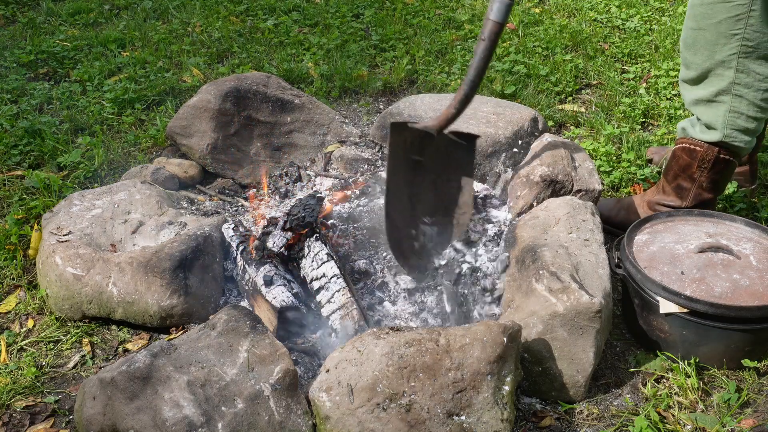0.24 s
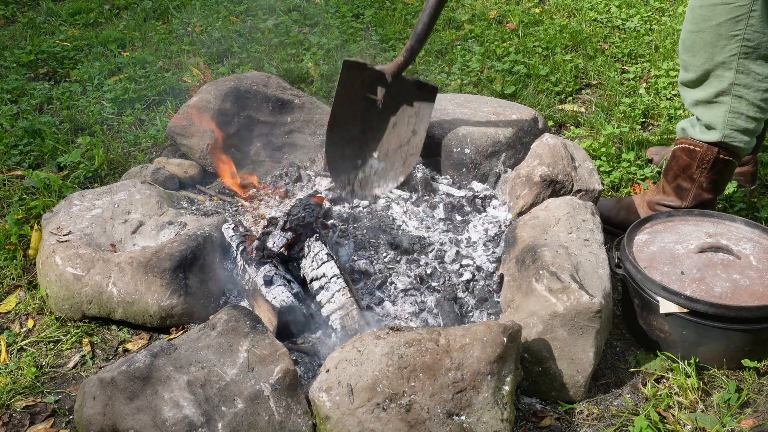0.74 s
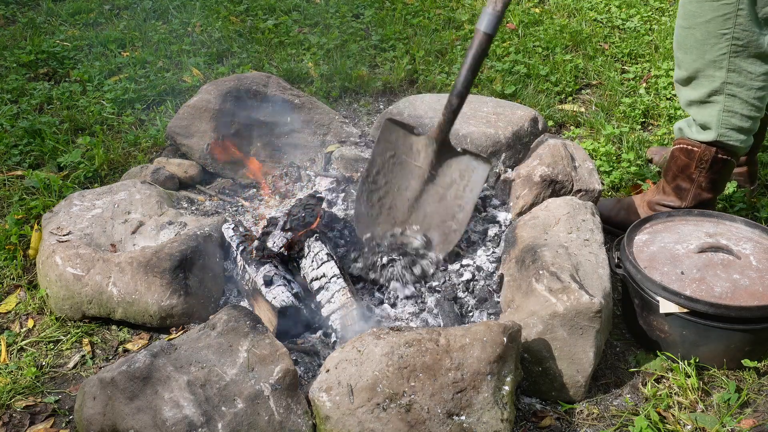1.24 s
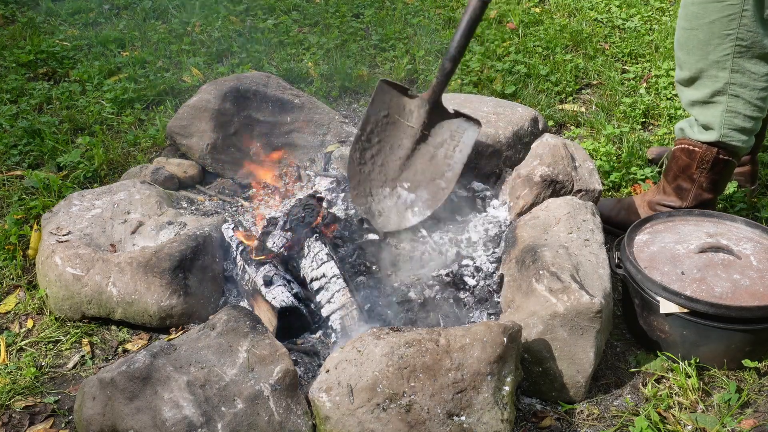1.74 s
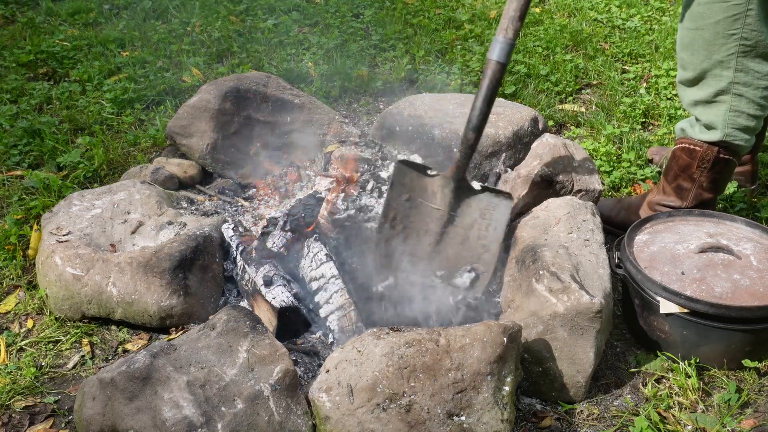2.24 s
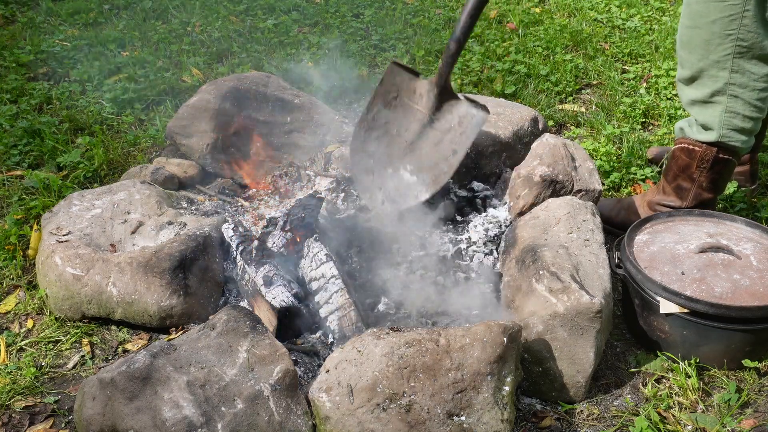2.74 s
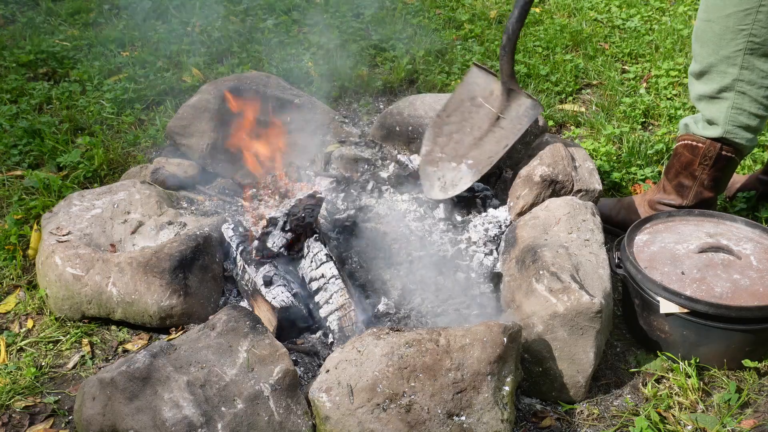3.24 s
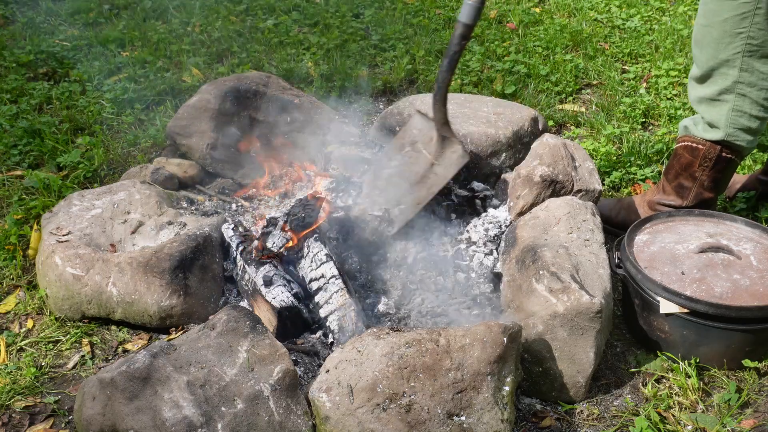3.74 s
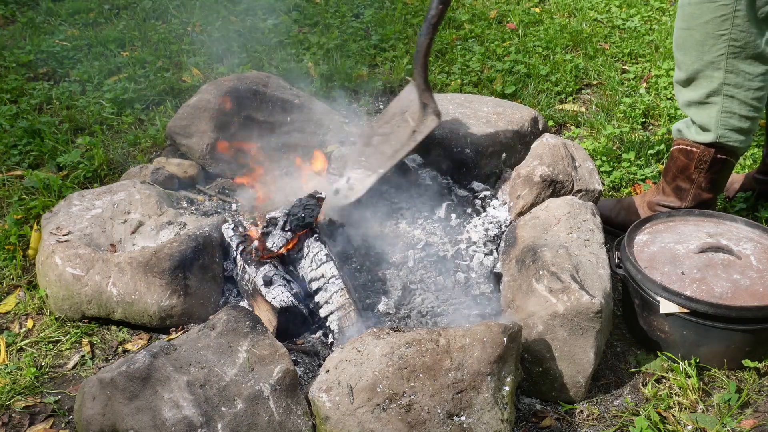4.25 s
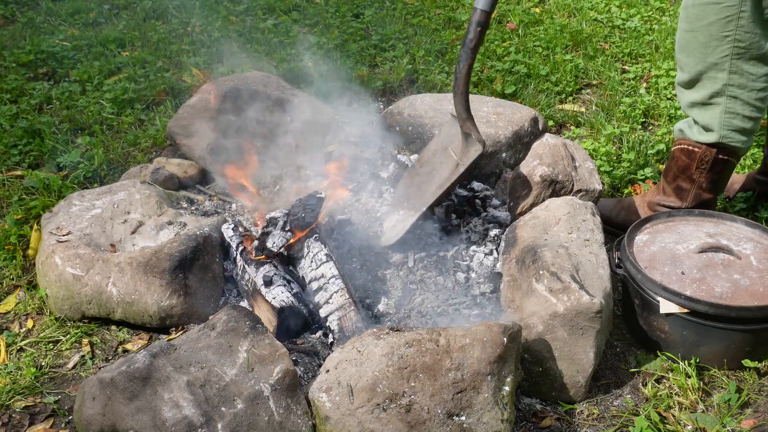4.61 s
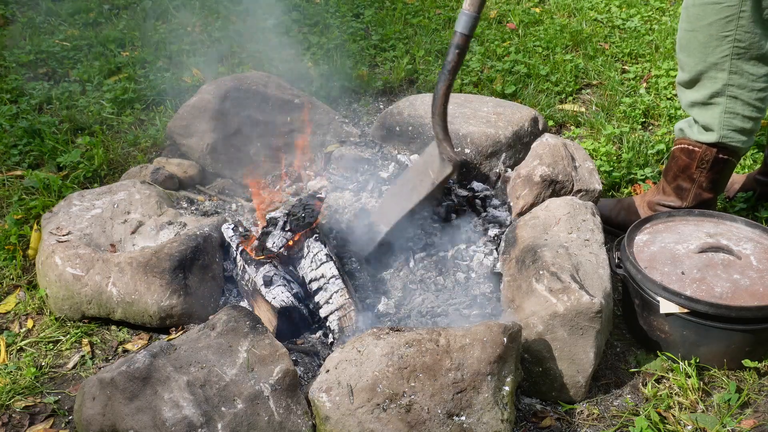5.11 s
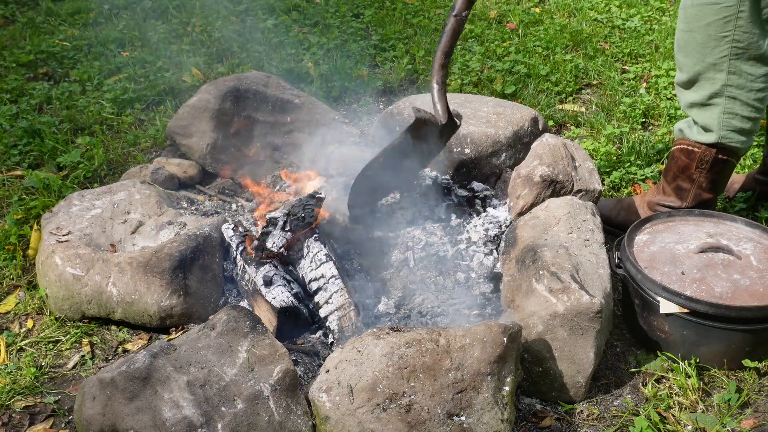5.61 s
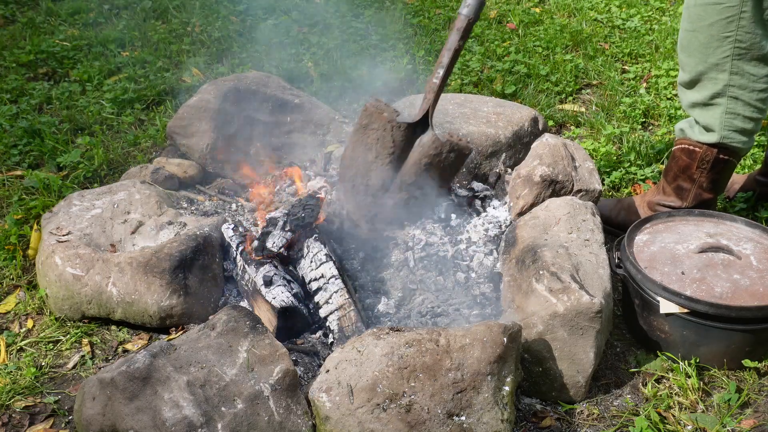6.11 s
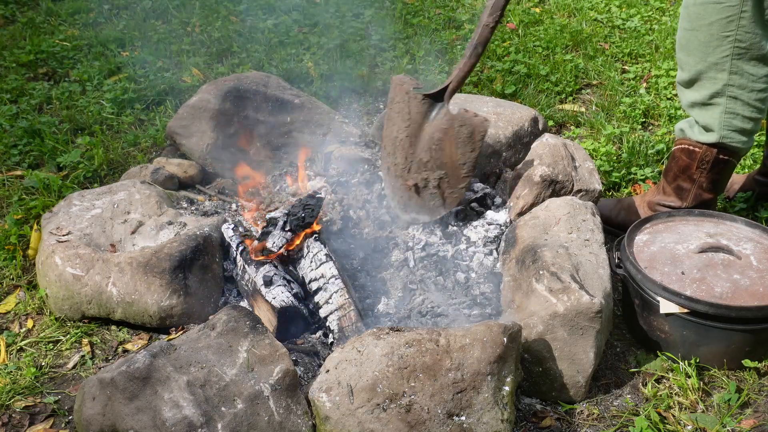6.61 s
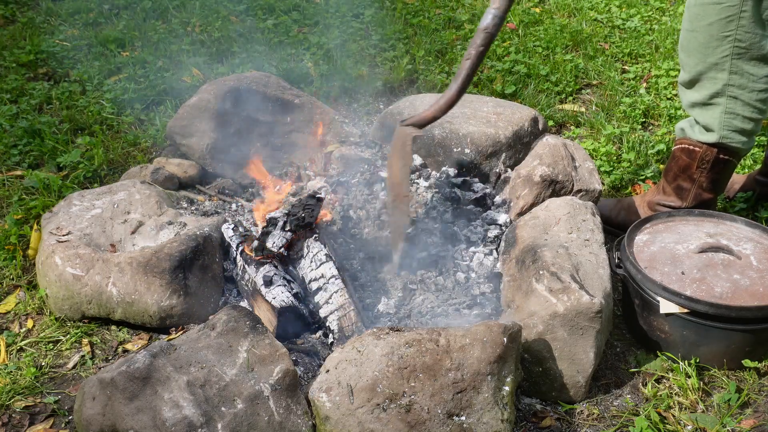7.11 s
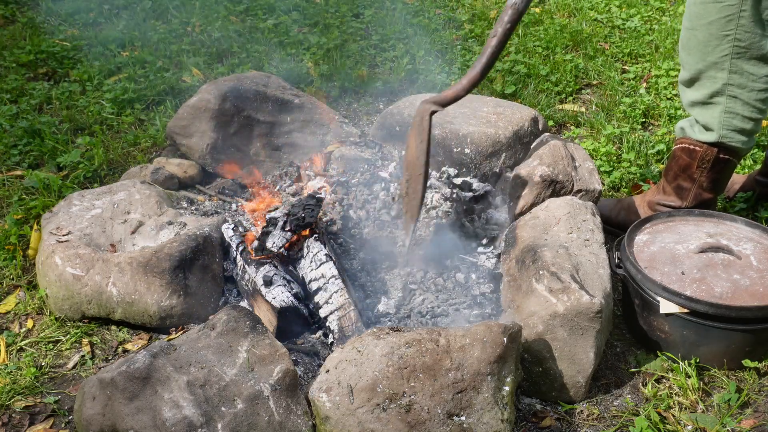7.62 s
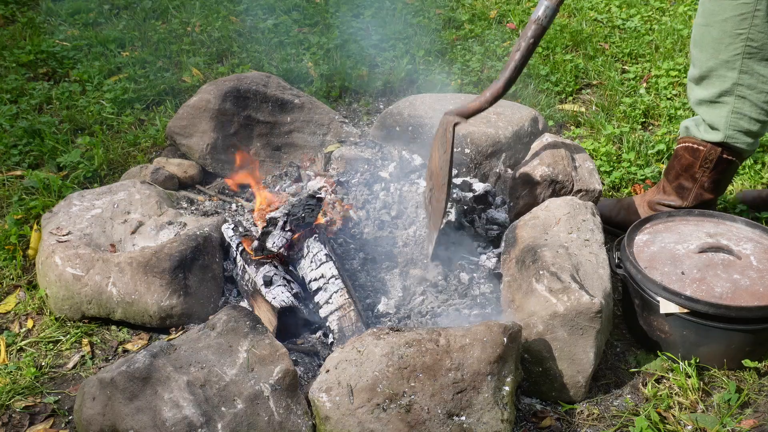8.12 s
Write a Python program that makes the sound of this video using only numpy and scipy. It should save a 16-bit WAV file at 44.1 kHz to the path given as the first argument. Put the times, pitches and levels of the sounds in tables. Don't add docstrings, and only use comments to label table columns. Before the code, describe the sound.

A steel spade works through ashes and coals in a stone fire ring in an open meadow, heard close in stereo with almost no echo. From 0 to 0.3 seconds it rasps loudly, crunching brittle lumps amid thumping wind. Another hard knock and scrape come at 0.7-0.9, with smaller strokes around 1.2, a big wind thump near 1.5, and softer scrapes at 2-2.5. After a lull, knocks and rasps return at 3.4-3.7; a hard cinder clinks brightly at 3.8 and bounces. Wind is calmer here. A very faint distant machine whines from about 4.3 to 6, while light jabs and clinks occur around 5.3-5.5 and 6-6.4. Low gusts swell strongly at 6.3-6.8. Weak scrapes follow at 7.2-7.4 and 7.8-7.9, with sharp ember snaps near 7.7 and more buffeting to the end at 8.4. Fine crackle and high and lower insect trills continue throughout.

```python
import sys
import numpy as np
from scipy import signal
from scipy.fft import rfft, irfft, next_fast_len
from scipy.io import wavfile
from scipy.ndimage import map_coordinates

SR = 44100
rng = np.random.default_rng(int(sys.argv[2]) if len(sys.argv) > 2 else 0)


def master(y):
    cut = np.clip(np.atleast_2d(y).T, -1, 1)
    pcm = np.round(cut * 32767)
    wavfile.write(sys.argv[1], SR, pcm.astype(np.int16))


def level_to_linear(level):
    exponent = np.asarray(level, float) / 20
    return 10 ** exponent


N = 368674


def unit(x):
    return x / np.sqrt(np.mean(x ** 2) + 1e-20)


def along(points, hz):
    f, db = np.transpose(points)
    return level_to_linear(np.interp(np.log(hz + 1), np.log(f + 1), db, left=-120, right=-120))


def curves(rows):
    s, *columns = np.transpose(rows)
    return [np.interp(np.arange(N) / SR, s, column) for column in columns]


def wobble(rate):
    knots = rng.standard_normal(int(N * rate / SR) + 4)
    return map_coordinates(knots, [np.arange(N) * rate / SR])


def filtered(x, response):
    m = next_fast_len(N + SR // 4)
    return irfft(rfft(x, m) * response(np.fft.rfftfreq(m, 1 / SR)), m)[..., :N]


def resonant(x, peaks):
    def response(hz):
        total = 0
        for k, (centre, width, db) in enumerate(peaks):
            one = 1j * hz * width / (centre ** 2 - hz ** 2 + 1j * hz * width)
            total = total + (-1) ** k * level_to_linear(db) * one
        return total

    power = sum(level_to_linear(2 * db) * np.pi * width / SR for _, width, db in peaks)
    return filtered(x, response) / np.sqrt(power)


def grains(rate, spread_db):
    chance, size = rng.random(N), rng.standard_normal((2, N))
    return unit((chance < rate / SR) * level_to_linear(spread_db * size[0]) * np.sign(size[1]))


def pair(spectrum, alike):
    alike_hz, likeness = np.transpose(alike)

    def response(hz):
        same = np.interp(np.log(hz + 1), np.log(alike_hz), likeness)
        turn = np.arccos(np.clip(same, -1, 1)) / 2
        return along(spectrum, hz) * np.array([np.cos(turn), np.sin(turn)])

    middle, side = filtered(rng.standard_normal((2, N)), response)
    return unit(np.array([middle + side, middle - side]))


def placed(x, pan_db, wide_db):
    t = np.arange(SR // 20) / SR
    stones = rng.standard_normal((2, len(t))) * level_to_linear(-60 * t / 0.091)
    back = signal.oaconvolve(x[None], stones / np.linalg.norm(stones[0]), axes=1)[:, :N]
    return x * level_to_linear(np.array([[pan_db / 2], [-pan_db / 2]])) + level_to_linear(wide_db) * back


def chips(level_db, count, centre_hz, octaves, cycles, spread_db):
    luck = rng.standard_normal((count, 2))
    start = (rng.random(count) * N).astype(int)
    hz = np.clip(centre_hz * 2 ** (octaves * luck[:, :1]), 500, 15000)
    step = np.arange(160)
    size = level_to_linear(spread_db * luck[:, 1:])
    shape = size * np.exp(-step / SR * hz / cycles) * np.sin(2 * np.pi * hz * step / SR)
    norm = np.sqrt(np.sum(shape ** 2) / N)
    shape = shape * level_to_linear(level_db[start])[:, None] / norm
    return np.bincount((start[:, None] + step).ravel(), shape.ravel(), N + len(step))[:N]


# time in seconds, buffet level in dB.
BREEZE = [(0, -27), (0.25, -30.5), (0.52, -41.5), (0.72, -49), (1.16, -39), (1.5, -54), (1.69, -50),
          (2.75, -54), (3.2, -66), (3.44, -51.5), (4.1, -64), (4.63, -43.5), (5.22, -41), (5.84, -43),
          (6.6, -35.5), (6.9, -35.5), (7.55, -40.5), (8.36, -28)]
# peak time in seconds, level in dB, seconds to fall by 10 dB.
GUSTS = [(0, -20.5, 0.0942), (0.179, -15.5, 0.0433), (0.793, -27.5, 0.08), (1.058, -33, 0.01),
         (1.35, -23, 0.1329), (1.487, -30, 0.03), (1.916, -40.5, 0.12), (2.19, -35, 0.05),
         (2.41, -37, 0.06), (2.749, -46, .2), (3.342, -45.5, .08), (3.632, -41, 0.13), (4.235, -40.5, 0.04),
         (4.53, -36, 0.12), (4.92, -31, 0.31), (5.448, -38, 0.2), (6.021, -33.5, .2), (6.435, -22, 0.13),
         (6.736, -20, 0.0742), (7.298, -33, 0.34), (7.653, -28.5, 0), (7.85, -26, 0.1), (8.02, -24.5, .18)]


def gusts():
    t = np.arange(0, N + 64, 64) / SR
    power = level_to_linear(2 * np.interp(t, *np.transpose(BREEZE)))
    for s, db, fall_s in GUSTS:
        away_s = np.maximum(t - s, 1.35 * (s - t))
        power = power + level_to_linear(2 * (db - 10 * away_s / fall_s))
    return curves(np.transpose([t, 10 * np.log10(power)]))[0]


# start in seconds, peak level in dB, pitch in Hz.
PUFFS = [(0.084, -24, 114), (0.171, -7, 116), (0.366, -15, 139), (0.771, -25, 76), (1.45, -4.5, 136),
         (3.351, -23, 79), (4.495, -18, 113), (6.316, -10.5, 160), (6.434, -12, 136), (6.709, -2.5, 90),
         (7.816, -10.5, 167), (7.911, -7.5, 156), (7.955, -12.5, 138), (8.042, -10.5, 83),
         (1.064, -21, 180), (1.254, -18, 136), (1.903, -30, 132), (2.159, -28, 109), (2.415, -25, 100),
         (4.238, -29, 92), (4.546, -21, 147), (4.796, -17, 89), (5.273, -22, 99), (6.095, -20.5, 140),
         (6.358, -15, 161), (6.542, -18, 135), (7.088, -20, 122), (7.182, -19, 89), (7.269, -19, 130),
         (7.418, -23.5, 76), (7.655, -18, 111), (7.894, -21, 120)]
# frequency in Hz, level in dB per Hz.
BUFFET = [(20, -36), (35, -15), (55, -4), (100, 2), (170, -2.5), (210, -7.5), (270, -21), (350, -51)]
# frequency in Hz, level in dB per Hz.
FLUTTER = [(130, -32), (200, 3), (320, -5.5), (450, -19), (650, -49)]


def wind():
    buffet_db = gusts()
    lumps = level_to_linear(3.0 * wobble(18))
    puffs, kicks, t = np.zeros(N + SR), np.zeros(N + SR), np.arange(SR // 10) / SR
    for s, db, hz in PUFFS:
        shape = level_to_linear(db - 10) * t / 0.012 * np.exp(1 - t / 0.0087)
        start = round(s * SR)
        puffs[start:][:len(t)] += shape * np.sin(2 * np.pi * hz * t * (1 - 1.05 * t))
        kicks[start:][:len(t)] += shape
    low = level_to_linear(buffet_db - 1.5) * unit(lumps * pair(BUFFET, [(40, 0.99), (200, 0.96)]))
    flutter_level = level_to_linear(1.176 * buffet_db - 15.5) * lumps + level_to_linear(-19.0) * kicks[:N]
    return low + flutter_level * pair(FLUTTER, [(300, 0.91)]) + puffs[:N]


# frequency in Hz, level in dB per Hz.
AIR = [(20, 0), (120, -1.5), (300, -10.5), (600, -16), (1500, -17), (3000, -15), (6000, -19), (9000, -31),
       (15500, -28)]
# frequency in Hz, likeness from 0 to 1.
AIR_ALIKE = [(100, 0.99), (300, 0.81), (1400, 0.59), (3000, 0.66), (7000, 0.11), (15000, 0.033)]


def open_air():
    return level_to_linear(-51.0 + wobble(2.19)) * pair(AIR, AIR_ALIKE)


def choir(song, rate_hz, depth, alike, count):
    t, power = np.arange(N) / SR, 0
    for _ in range(count):
        own_hz = rate_hz * (1 + 0.12 * rng.standard_normal())
        beat = 2 * np.pi * own_hz * t + 3.3 * wobble(6.7)
        power = power + (1 + depth * np.cos(beat)) ** 2
    return unit(np.sqrt(power) * pair(song, [(5000, alike)]))


# time in seconds, high choir in dB, low choir in dB.
CHOIR = [
    (0.0, -43, -47),
    (0.32, -44.5, -51.5),
    (4.75, -44.5, -52.5),
    (6.49, -45, -52.5),
    (8.36, -45.5, -54.5),
]
# frequency in Hz, level in dB per Hz.
HIGH_SONG = [(6300, -24.5), (6900, -11.5), (7300, -1), (7700, -1.5), (8100, -4.5), (8500, -22.5),
             (8900, -25)]
# frequency in Hz, level in dB per Hz.
LOW_SONG = [(3700, -27), (4000, -14), (4250, -6.5), (4500, -13.5), (4800, -24)]


def insects():
    high_db, low_db = curves(CHOIR)
    high = level_to_linear(high_db + 1.0 * wobble(3.203)) * choir(HIGH_SONG, 92, depth=0.16, alike=0.45, count=3)
    low = level_to_linear(low_db + 1.3 * wobble(2.97)) * choir(LOW_SONG, 58, depth=0.26, alike=0.73, count=3)
    return high * level_to_linear(np.array([[-0.7], [0.7]])) + low * level_to_linear(np.array([[-1.6], [1.6]]))


def embers():
    level_db = -71 + 2.2 * wobble(2.93)
    specks = chips(level_db, count=260, centre_hz=10400, octaves=0.46, cycles=10.0, spread_db=5.0)
    return placed(specks, pan_db=-4.0, wide_db=-5)


# peak time in seconds, build-up in seconds, rasp in dB,
# lowest mode over rasp in dB, ash hiss over rasp in dB.
PUSHES = [(0.039, 0.057, -23.5, 1.5, -11.5), (0.279, 0.13, -44, 3.5, -4), (0.718, 0.0053, -26.5, -11, -25),
          (0.861, 0.071, -25, -7, -14.5), (1.175, 0.022, -36.5, -9, -18), (1.233, 0.034, -33, -6, -18),
          (2.105, 0.075, -35.5, -9, -20), (2.215, 0.069, -31, 0.5, -18.5), (2.475, 0.051, -39, -6.5, -14.5),
          (3.385, 0.029, -31.5, -8, -21), (3.63, 0.058, -34, -9, -21), (3.689, 0.064, -29.5, -12, -13.5),
          (3.79, 0.05, -47, -6, -17), (7.24, 0.073, -38.5, -4.5, -15.5), (7.388, 0.056, -43.5, -9, -5),
          (7.797, 0.032, -42, -9, -25), (7.933, 0.044, -35.5, -10, -18)]
# peak time in seconds, build-up in seconds, rasp in dB,
# lowest mode over rasp in dB, ash hiss over rasp in dB.
JABS = [(0.116, 0.035, -20.5, -8.5, -12), (1.96, .03, -40, -19, -12), (2.53, .03, -40, -8, -20),
        (3.342, 0.017, -47, -15, -17), (3.412, .015, -38.5, -8, -17), (5.18, 0.014, -43, -16, -15),
        (5.215, 0.017, -42, -15, -14), (5.32, .02, -44, -11, -15), (5.505, 0.041, -40.5, -15, -16),
        (6.0, .034, -33, -11, -16), (6.425, 0.023, -40.5, -21, -17), (1.44, 0.099, -48.5, -10, -18),
        (3.22, 0.26, -63, -15, 3)]
# peak time in seconds, build-up in seconds, rasp in dB,
# ash hiss over rasp in dB.
SCUFFS = [(0.973, 0.0092, -41, -17), (1.118, 0.03, -42, -11), (1.975, 0.016, -36.5, -18),
          (2.36, 0.015, -38.5, -22), (2.938, 0.026, -60.5, 13), (4.919, 0.039, -40.5, -24),
          (5.27, 0.04, -36, -12), (5.552, 0.041, -38.5, -19), (6.153, 0.04, -39.5, -18),
          (6.325, 0.064, -39.5, -16), (6.39, 0.057, -42.5, -13), (7.069, 0.021, -45.5, -18),
          (8.276, 0.055, -53, -14)]
# peak time in seconds, rasp in dB.
SLIDES = [(0.17, -41), (1.25, -37), (2.0, -41.5), (2.5, -47.5), (3.42, -52.5), (3.74, -39.5), (5.3, -48.5),
          (6.44, -46), (6.55, -48), (1.06, -47), (7.96, -48)]
# rasp, lowest mode and ash hiss, all in dB.
REST_DB = (-63.5, -78, -73.5)


def stroke():
    bite_db_s, swell_db = 1100, 8
    lift_db_s, jab_lift_db_s, slide_db_s = 267, 700, 74
    rows = [(*push, lift_db_s) for push in PUSHES]
    rows += [(s, build_s, db, -20, ash_db, lift_db_s) for s, build_s, db, ash_db in SCUFFS]
    rows += [(*jab, jab_lift_db_s) for jab in JABS]
    rows += [(s, 0.03, db, -11.5, -17.5, slide_db_s) for s, db in SLIDES]
    t = np.arange(0, N + 64, 64) / SR
    power = level_to_linear(2 * np.array(REST_DB))[:, None]
    for s, build_s, db, low_db, ash_db, fall_db_s in rows:
        before, after = np.maximum(s - t, 0), np.maximum(t - s, 0)
        swell = -swell_db * np.minimum(before / build_s, 1)
        bite = -bite_db_s * np.maximum(before - build_s, 0)
        parts_db = np.array([[0], [low_db], [ash_db]])
        power = power + level_to_linear(2 * (db + swell + bite - fall_db_s * after + parts_db))
    return curves(np.transpose([t, *(10 * np.log10(power))]))


# pitch in Hz, level in dB, seconds to fade by 60 dB.
BLADE = [(723, -14.5, 0.076), (1197, -11.5, 0.086), (1424, -9.5, 0.083), (1557, -8.5, 0.16),
         (1618, -7.5, 0.06), (1750, -6.5, 0.089), (1822, -5, 0.14), (1953, -2.5, 0.059),
         (2119, -0.5, 0.077), (2353, -3, 0.085), (2498, -1.5, 0.035), (2725, 1, 0.08), (2990, 3, 0.062),
         (3290, 0.5, 0.1), (3520, 4.5, 0.033), (3800, 4, 0.063), (3915, 0.5, 0.08), (4130, 4.5, 0.071),
         (4540, 3, 0.06), (4815, 4, 0.049), (5335, -1.5, 0.06), (5870, -28, 0.12), (6720, -16, .06)]
# pitch in Hz, width in Hz, level in dB.
LOW_MODE = [(614, 20, -14), (718, 16, -9), (818, 16, -4), (840, 10, 0)]
# frequency in Hz, level in dB per Hz.
GRIT = [(240, -22), (400, -7.5), (623, -2.5), (819, -4.5), (1020, -8), (1610, -16), (2260, -12), (2790, 6),
        (9000, -25), (11700, -46), (19800, -120)]
# frequency in Hz, level in dB per Hz.
ASH = [(3240, -7), (5500, -7.5), (6940, -4), (9490, -6.5), (12600, -11.5), (16000, -14)]


def rasp():
    rasp_db, low_db, ash_db = stroke()
    clump_db = 2.2 * wobble(70)
    clumps = level_to_linear(clump_db)
    steel = [(hz, np.log(1000) / np.pi / t60, db) for hz, db, t60 in BLADE]
    ring = 0
    for modes, share_db in ((steel[:7], -8.5), (steel[7:14], -5.5), (steel[14:], -9.5)):
        swells = level_to_linear(2.6 * wobble(30) + 2.45 * wobble(120))
        push = unit(clumps * swells * grains(1500, spread_db=5.5))
        ring = ring + resonant(level_to_linear(rasp_db + share_db) * push, modes)
    low_push = unit(clumps * grains(2000, spread_db=4.0))
    low = resonant(level_to_linear(low_db - 5.5) * low_push, LOW_MODE)
    grit = filtered(grains(3000, spread_db=5.5), lambda hz: along(GRIT, hz))
    crunch = unit(clumps * level_to_linear(1.3 * wobble(150)) * grit)
    coals = chips(rasp_db + clump_db - 7.5, count=6000, centre_hz=3600, octaves=0.55, cycles=3.3, spread_db=3.0)
    ash = filtered(grains(4000, spread_db=5), lambda hz: along(ASH, hz))
    hiss = unit(clumps * level_to_linear(3.95 * wobble(200)) * ash)
    body = ring + low + coals + level_to_linear(rasp_db - 9.5) * crunch
    hiss = level_to_linear(ash_db + 2.5) * hiss
    return placed(body, pan_db=-0.9, wide_db=-51) + placed(hiss, pan_db=-2.0, wide_db=-7.5)


# start in seconds, peak level in dB, centre of the ring in Hz.
CRUSHES = [(0.0115, -14.5, 1790), (0.0304, -15, 1730), (0.2667, -28, 1750), (0.736, -17.5, 2910),
           (0.9693, -29, 3290), (1.2447, -26, 2260), (2.183, -26, 2380), (2.2127, -21, 2990),
           (4.92, -31.5, 2950), (5.5533, -22, 3960), (5.9697, -32, 2010), (7.061, -32.5, 3200),
           (7.3825, -30, 2400), (7.7586, -29, 2000), (7.922, -29, 3510), (0.7138, -9.5, 3900),
           (0.7136, -20.5, 1830), (1.2203, -26, 4180), (1.344, -30, 3800), (1.5605, -40, 4370),
           (1.9648, -22.5, 4290), (2.165, -29, 3600), (3.384, -26, 1000), (6.0015, -30, 4200),
           (6.143, -32, 3900), (0.165, -27, 1700)]
# start in seconds, peak level in dB, centre of the ring in Hz.
KNOCKS = [(0.0436, -12, 1590), (0.1012, -14.5, 3760), (0.137, -21, 3610), (0.7044, -12.5, 2990),
          (0.7138, -13, 3050), (0.782, -19, 2800), (1.0364, -26.5, 2880), (1.1526, -20.5, 3300),
          (1.1715, -28, 1890), (1.22, -16, 2800), (1.344, -27, 1980), (1.9647, -16, 3000),
          (2.0556, -24, 2900), (2.089, -26.5, 2650), (2.3493, -28.5, 2780), (3.3597, -20.5, 2720),
          (3.3842, -18.5, 2720), (3.408, -31, 1770), (3.645, -22, 2720), (3.669, -20, 2750),
          (4.8852, -31.5, 3400), (5.2596, -29, 1580), (5.5446, -22, 1640), (5.5642, -25.5, 1870),
          (6.284, -27, 4130), (6.409, -24.5, 3460), (7.152, -32, 3000), (7.2331, -25.5, 3300),
          (7.2664, -25.5, 3130), (7.8852, -30.5, 1840), (0.0782, -20, 1820), (0.8445, -17, 3220),
          (1.949, -29, 2760), (2.0197, -31, 2410), (2.4325, -34, 3330), (3.3434, -32, 2720),
          (3.5668, -39, 3760), (3.603, -27, 2850), (5.9779, -26.5, 4160), (6.3059, -33, 2750),
          (6.5618, -37, 2830), (7.215, -33, 2900)]


def knocks():
    out, t = np.zeros(N + SR), np.arange(SR // 9) / SR
    hz, level, t60 = np.transpose(BLADE)[:, :, None]
    lumps = [(*knock, 0, -11.5) for knock in KNOCKS]
    lumps += [(*crush, -2.5, 0) for crush in CRUSHES]
    for s, db, centre_hz, ring_db, crack_db in lumps:
        luck = rng.standard_normal((2, len(BLADE), 1))
        near_db = np.maximum(-45 * np.log2(hz / centre_hz) ** 2, -24)
        fade = level_to_linear(level + near_db + 3.2 * luck[0] - 60 * t / (0.67 * t60))
        modes = fade * np.sin(2 * np.pi * hz * t + 0.68 * luck[1])
        ring = modes.sum(axis=0) * (1 - np.exp(-t / 0.00035))
        burst = rng.standard_normal(len(t)) * level_to_linear(-60 * t / 0.022)
        band = signal.butter(2, [centre_hz / 1.7, centre_hz * 1.6], "band", fs=SR)
        crack = signal.lfilter(*band, burst)
        both = level_to_linear(ring_db) * ring / np.abs(ring).max() + level_to_linear(crack_db) * crack / np.abs(crack).max()
        out[round(s * SR):][:len(t)] += level_to_linear(db - 2.5) * both
    return placed(out[:N], pan_db=-1.5, wide_db=-38)


# start in seconds, peak level in dB, body level in dB,
# seconds for the click to fade by 60 dB.
SNAPS = [(0.041, -17, -8, 0.0084), (0.0617, -23, -16, 0.005), (0.1893, -23, 0, 0.0087),
         (0.2174, -32, -7.5, 0.0039), (0.7341, -24, 1, 0.005), (1.8117, -38, -30, 0.005),
         (2.2123, -24, -18, 0.005), (2.45, -27, -14, 0.005), (2.627, -38, -9, 0.005),
         (2.9341, -24, -19, 0.005), (2.9432, -36, -9, 0.005), (3.024, -30, -20, .004),
         (3.028, -25, -13, 0.0089), (3.7787, -27, -10, 0.0059), (3.9523, -53, -9, 0.005),
         (4.475, -36, 0, 0.005), (5.234, -26.5, 12.5, 0.01), (5.773, -37.5, 4.5, 0.005),
         (6.364, -28, 0, 0.0055), (6.527, -27.5, -1, 0.005), (6.6761, -26, -19, 0.0043),
         (6.722, -32, -18, 0.0055), (7.1241, -36, -16, 0.005), (7.3915, -28, -19, 0.005),
         (7.6856, -27, -14, 0.0055), (7.733, -16, -5, 0.0075), (7.773, -20, -7, 0.0059),
         (7.7924, -21, -3, 0.005), (7.9931, -31, 0.5, 0.0055), (8.271, -24, -5.5, 0.0027),
         (3.505, -36, -12, .004), (3.668, -30, -10, .006), (1.888, -40, -20, .004)]


def snaps():
    out, t = np.zeros(N + SR), np.arange(SR // 25) / SR
    top = signal.butter(2, 7500, "high", fs=SR)
    mid = signal.butter(2, [2800, 5500], "band", fs=SR)
    for s, db, body_db, t60 in SNAPS:
        click = rng.standard_normal((2, len(t))) * level_to_linear(-60 * t / t60)
        click[:, 0] = 4.0
        high, body = signal.lfilter(*top, click[0]), signal.lfilter(*mid, click[1])
        both = high / np.abs(high).max() + level_to_linear(body_db + 0.5) * body / np.abs(body).max()
        out[round(s * SR):][:len(t)] += level_to_linear(db + 1.5) * both
    return placed(out[:N], pan_db=-1.5, wide_db=-7.0)


# start in seconds, peak level in dB,
# pitch in Hz, seconds to fade by 60 dB.
PINGS = [(0.058, -22, 8340, .04), (0.22, -34, 5130, .04), (0.232, -33, 8600, 0.033),
         (0.268, -42, 6350, .03), (0.284, -31, 4900, 0.034), (0.268, -40.5, 842, .4),
         (0.268, -40, 1808, .3), (0.847, -30, 1950, 0.13), (0.826, -29.5, 1420, 0.09),
         (0.898, -36, 5370, .03), (1.036, -46, 840, .4), (1.152, -39.5, 840, 0.11),
         (1.172, -34.5, 1824, 0.18), (1.268, -31, 2720, .08), (1.344, -40, 1820, 0.31),
         (2.09, -36, 839, .2), (2.217, -31, 816.5, .22), (2.448, -37, 6300, .05), (2.52, -38, 3300, .04),
         (2.55, -45.5, 838, 0.16), (3.137, -39, 2500, .015), (3.384, -40, 832, 0.28),
         (3.70, -35.5, 1747, 0.21), (3.778, -37, 5450, .03), (4.15, -40, 500, .04),
         (5.255, -22, 4140, 0.05), (5.53, -34, 2350, .1), (5.553, -28, 5330, 0.033),
         (5.989, -31, 2350, .05), (6.01, -43, 2080, .12), (7.195, -40, 2900, 0.09), (7.383, -36, 2720, .04),
         (7.758, -41, 838, 0.19), (7.918, -36, 841, .2), (5.258, -31, 1640, .12), (5.3, -38, 1640, .2),
         (5.556, -30, 1820, .15), (7.383, -30, 1450, .05), (3.36, -31, 2720, .12), (3.64, -29, 2740, .06),
         (0.705, -25, 3020, .2), (0.135, -28, 3610, .06), (0.072, -27, 1820, .1), (7.885, -38, 1820, .3),
         (2.17, -40, 2100, .2), (2.51, -41, 1820, .2)]
# start in seconds, peak level in dB.
CLINKS = [
    (3.828, -12.5),
    (3.908, -28),
    (3.963, -25.5),
    (4.1304, -38),
    (5.2602, -27),
    (5.2726, -25),
    (5.4668, -34),
    (5.5312, -34),
    (6.1422, -24.5),
]
# pitch in Hz, level in dB, seconds to fade by 60 dB.
CINDER = [(1648, -5, 0.11), (1907, -9.5, 0.096), (2750, -11, 0.038), (3080, -19, 0.044), (786, -37, .04)]


def clinks():
    out, t = np.zeros(N + SR), np.arange(SR // 3) / SR
    hz, level, t60 = np.transpose(CINDER)[:, :, None]
    for s, db in CLINKS:
        luck = rng.standard_normal((len(CINDER), 1))
        ring = level_to_linear(level + 0.98 * luck - 60 * t / t60) * np.sin(2 * np.pi * hz * t)
        out[round(s * SR):][:len(t)] += level_to_linear(db - 5.0) * ring.sum(axis=0) * (1 - np.exp(-t / 0.00071))
    for s, db, tone_hz, ring_s in PINGS:
        tone = level_to_linear(db - 60 * t / ring_s) * np.sin(2 * np.pi * tone_hz * t)
        out[round(s * SR):][:len(t)] += tone * (1 - np.exp(-t / 0.0016))
    return placed(out[:N], pan_db=-0.9, wide_db=-40)


# middle in seconds, length in seconds, level in dB, pitch in Hz.
WHINE = [(4.51, 0.056, -58, 1175), (4.634, .1, -55, 1260), (4.75, 0.14, -56, 1255),
         (4.832, .08, -54.5, 1267), (4.972, 0.13, -56, 1255), (5.084, 0.053, -49.5, 1260),
         (5.15, .12, -55.5, 1195), (5.24, 0.12, -53, 1250), (5.65, 0.13, -58, 1240),
         (5.93, 0.054, -55, 1190), (4.75, 0.27, -62, 3560), (5.0, 0.32, -61, 3460), (5.37, .09, -57, 3490),
         (4.95, .6, -57, 1240), (4.4, .2, -62, 1290)]


def whine():
    width_hz, steady = 55, 0.8
    out, fuzz = np.zeros(N), steady + wobble(width_hz) + 1j * wobble(width_hz)
    for s, length_s, db, hz in WHINE:
        i = np.arange(round((s - length_s) * SR), round((s + length_s) * SR))
        swell = np.exp(-(1.7 * (i / SR - s) / length_s) ** 4)
        out[i] += level_to_linear(db - 3.5) * swell * np.real(fuzz[i] * np.exp(2j * np.pi * hz * i / SR))
    return out


def scene():
    meadow = open_air() + insects() + whine()
    fire = embers() + snaps()
    spade = rasp() + knocks() + clinks()
    return wind() + meadow + fire + spade


def top_cut(x):
    return signal.sosfilt(signal.butter(12, 16630, fs=SR, output="sos"), x)


def record(dry):
    top_hz = 15750
    mix = filtered(dry, lambda hz: hz < top_hz)
    return top_cut(mix)


dry = scene()
out = record(dry)
master(out)
```